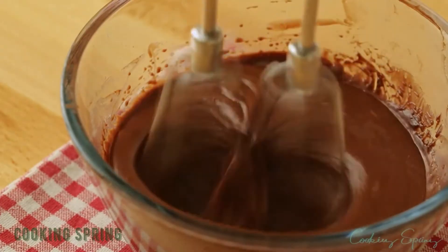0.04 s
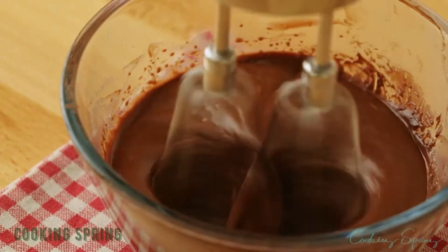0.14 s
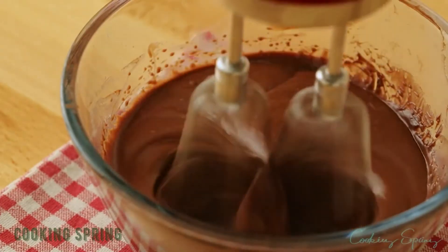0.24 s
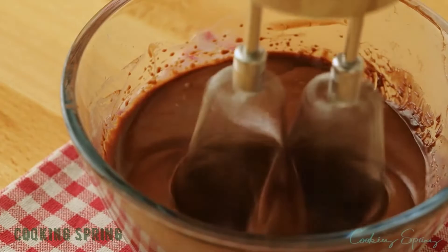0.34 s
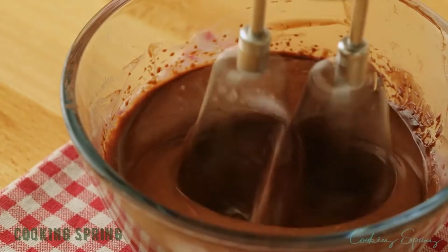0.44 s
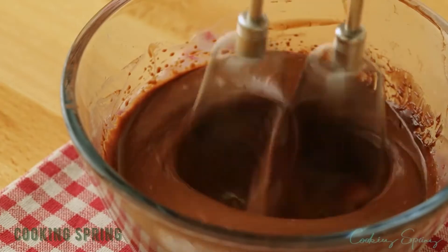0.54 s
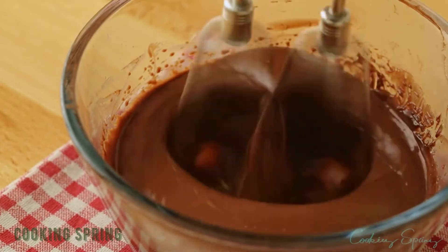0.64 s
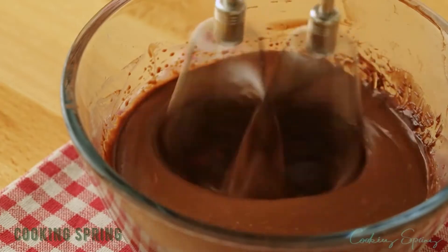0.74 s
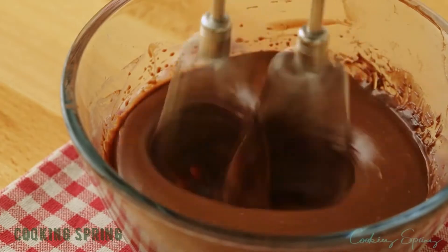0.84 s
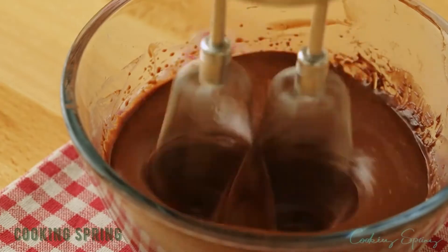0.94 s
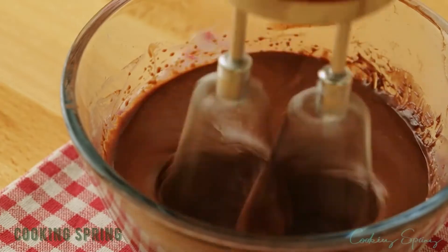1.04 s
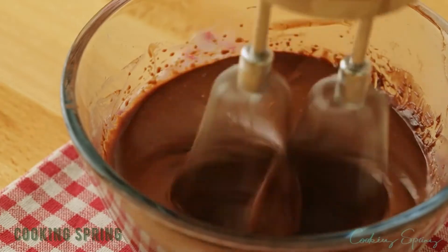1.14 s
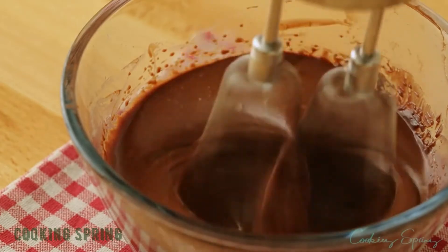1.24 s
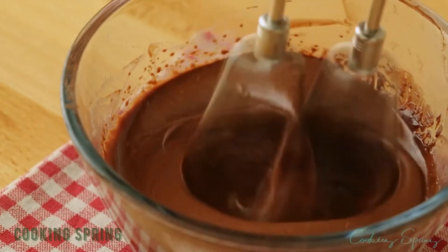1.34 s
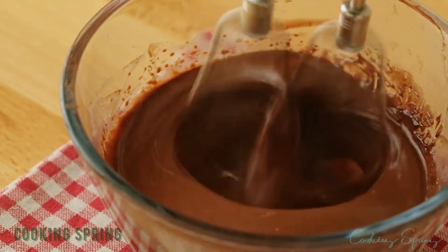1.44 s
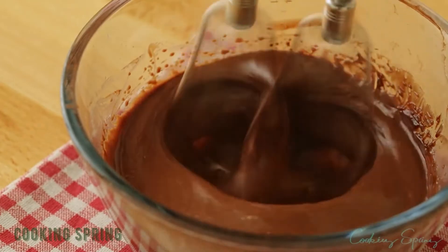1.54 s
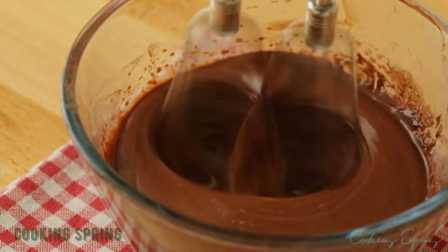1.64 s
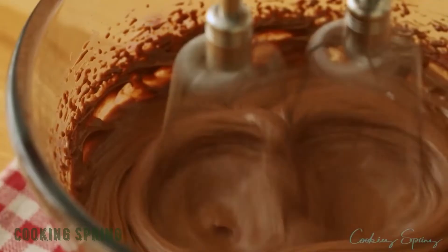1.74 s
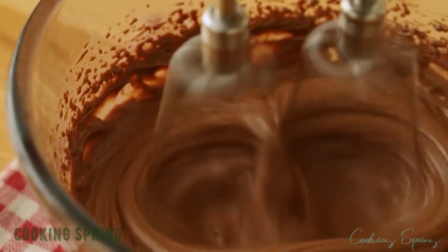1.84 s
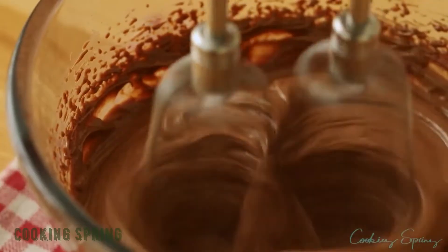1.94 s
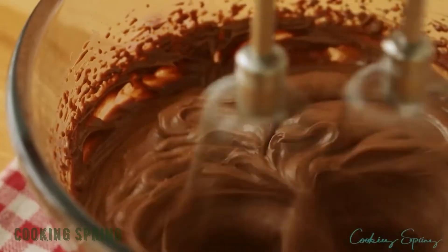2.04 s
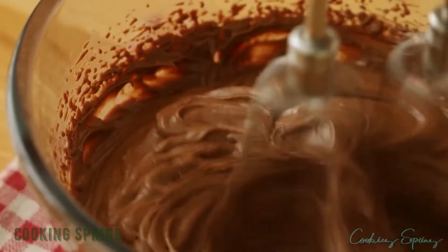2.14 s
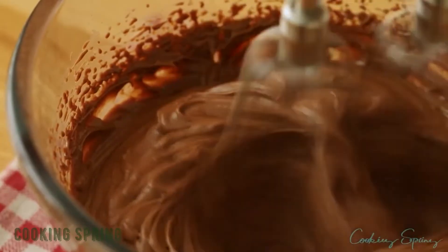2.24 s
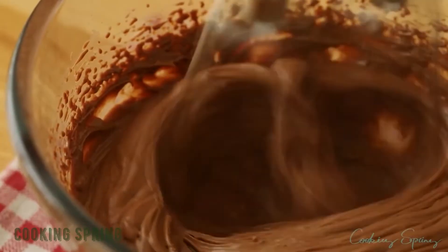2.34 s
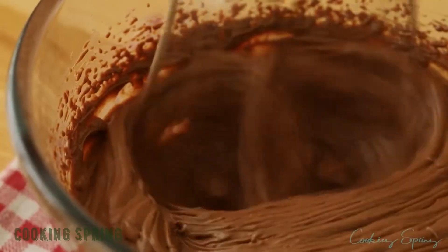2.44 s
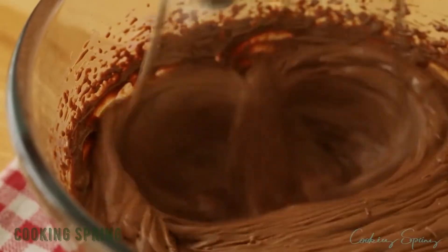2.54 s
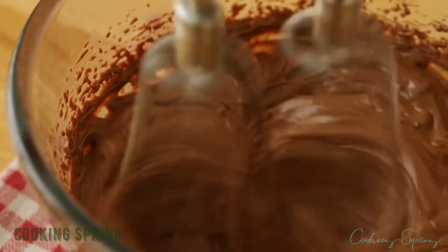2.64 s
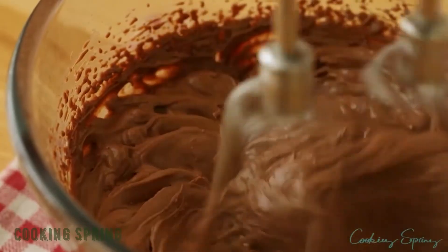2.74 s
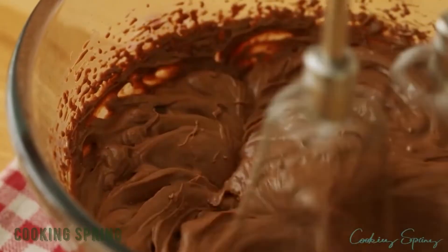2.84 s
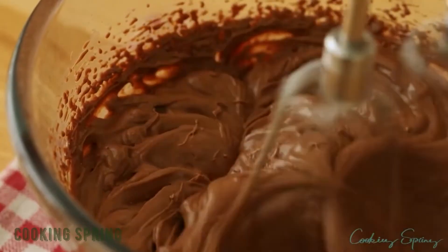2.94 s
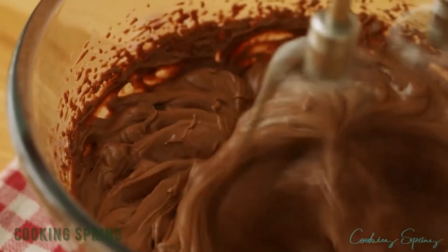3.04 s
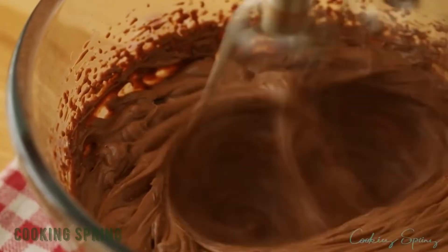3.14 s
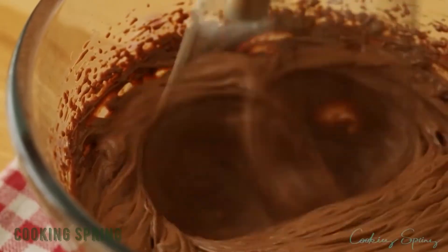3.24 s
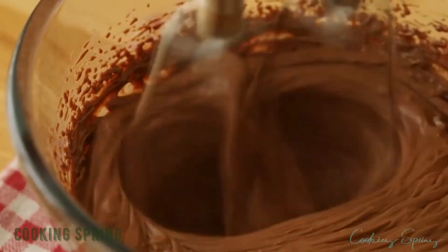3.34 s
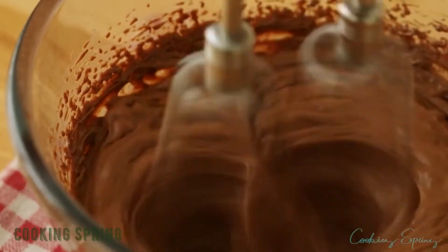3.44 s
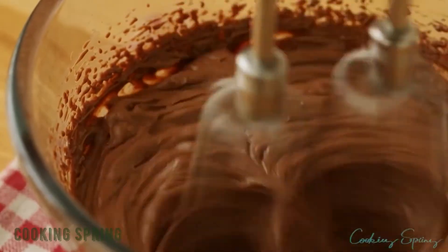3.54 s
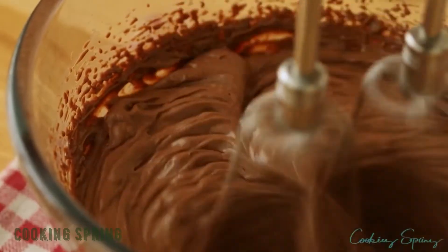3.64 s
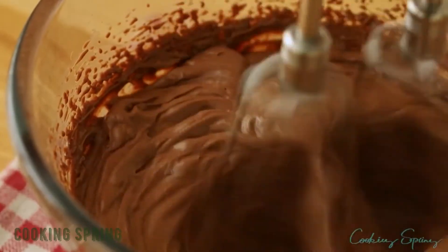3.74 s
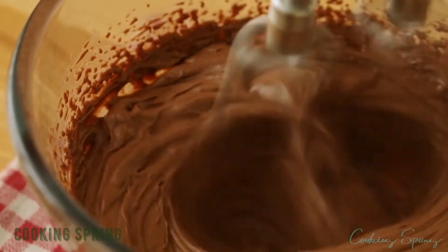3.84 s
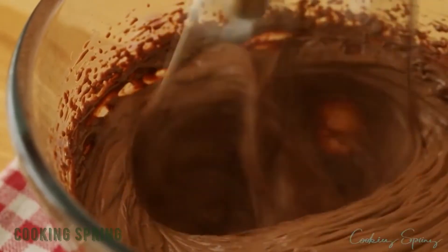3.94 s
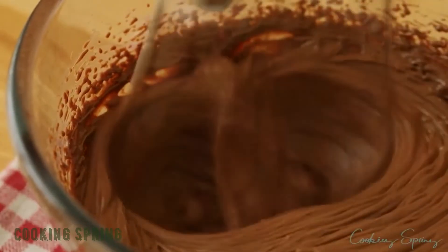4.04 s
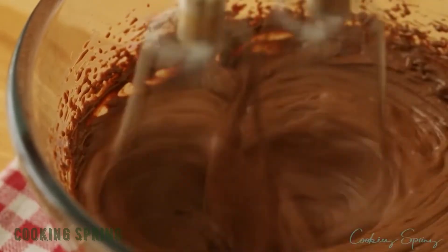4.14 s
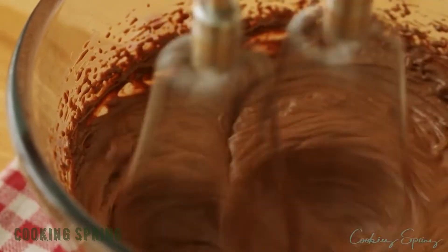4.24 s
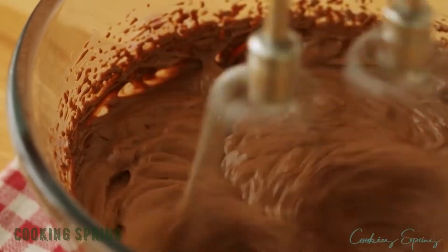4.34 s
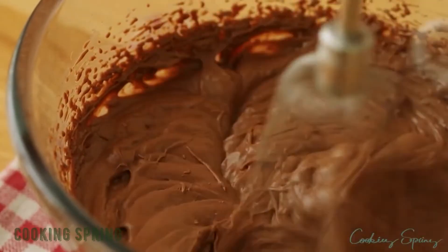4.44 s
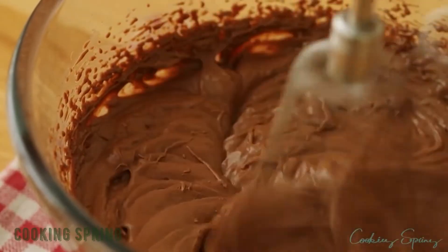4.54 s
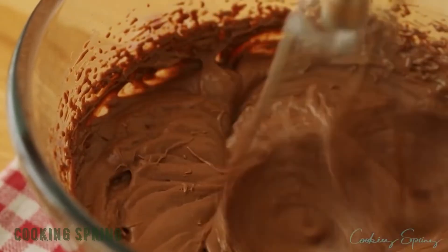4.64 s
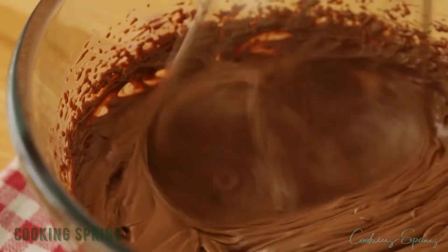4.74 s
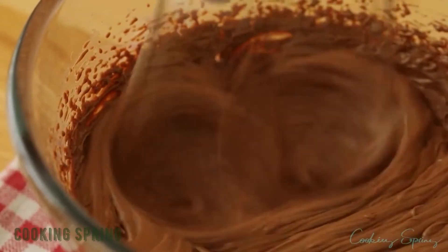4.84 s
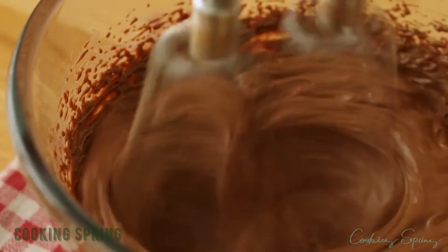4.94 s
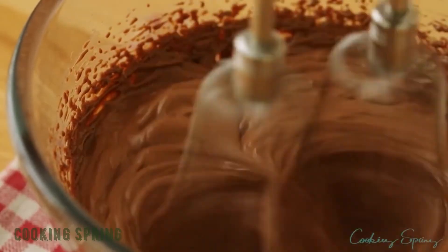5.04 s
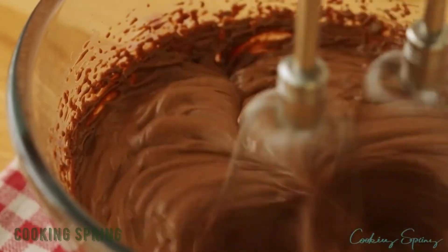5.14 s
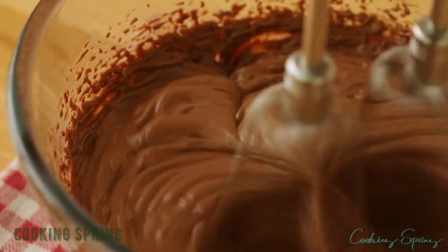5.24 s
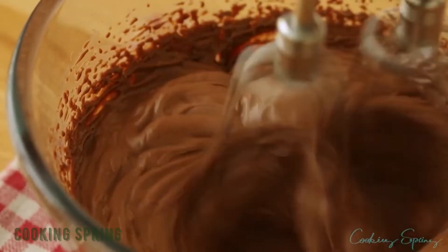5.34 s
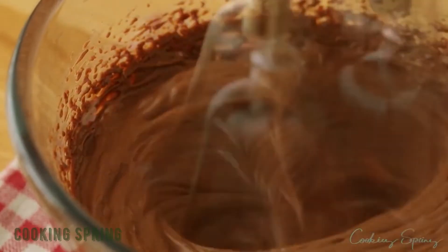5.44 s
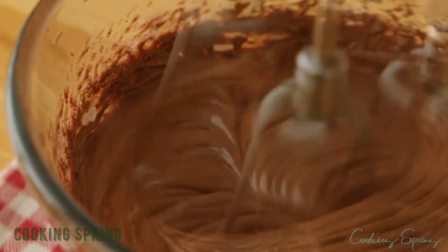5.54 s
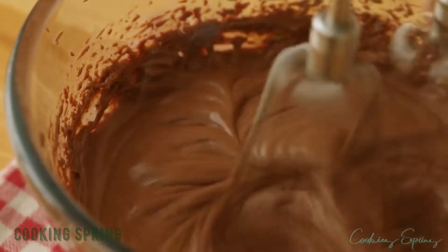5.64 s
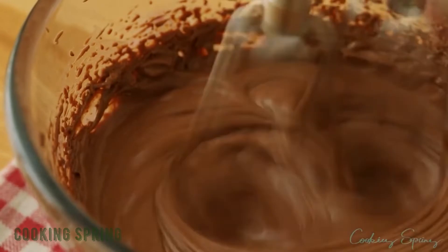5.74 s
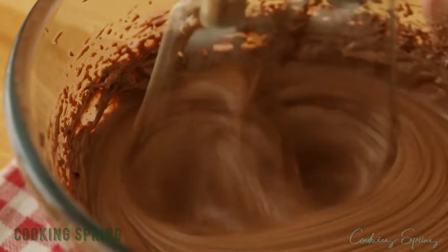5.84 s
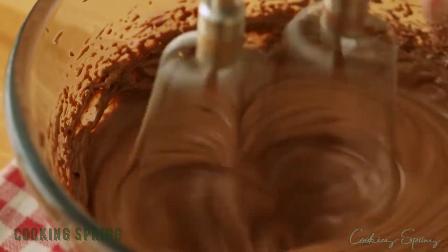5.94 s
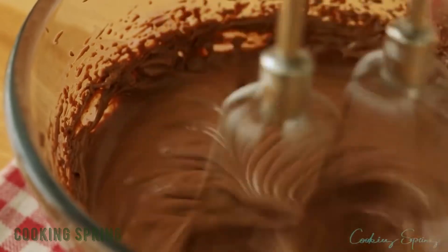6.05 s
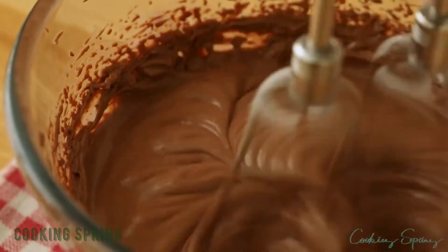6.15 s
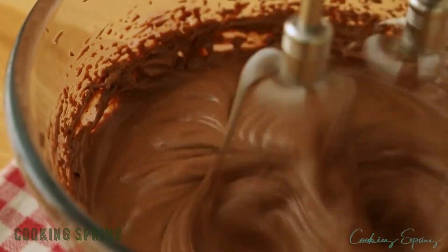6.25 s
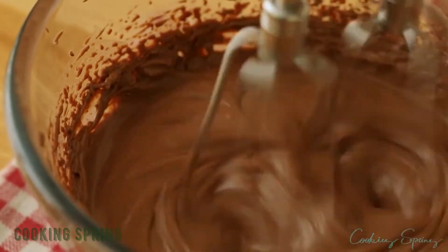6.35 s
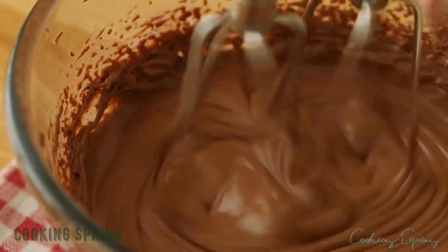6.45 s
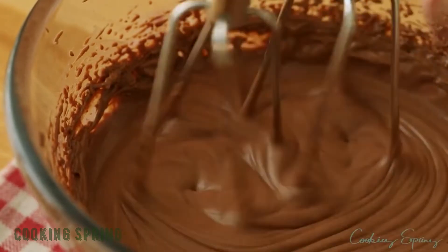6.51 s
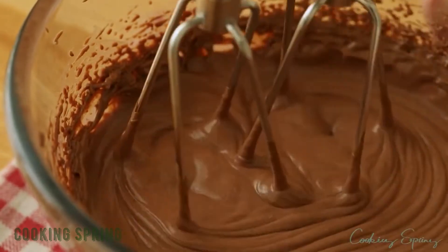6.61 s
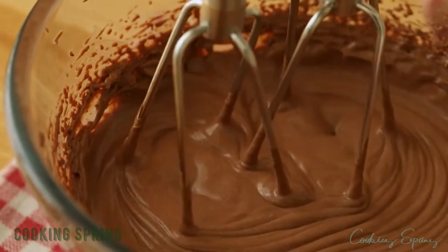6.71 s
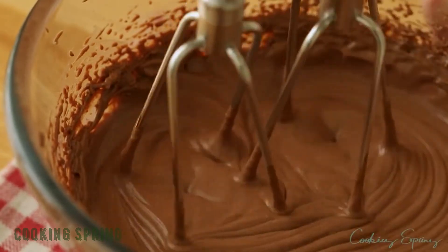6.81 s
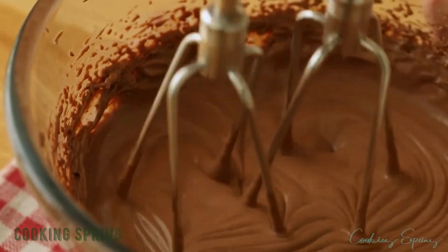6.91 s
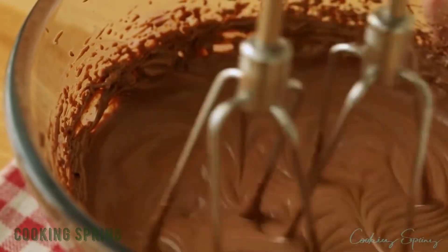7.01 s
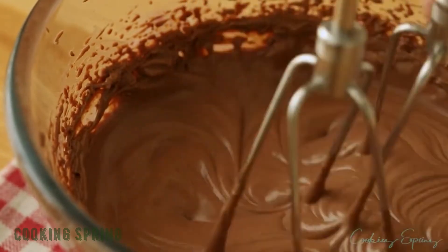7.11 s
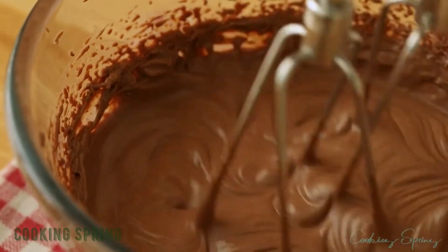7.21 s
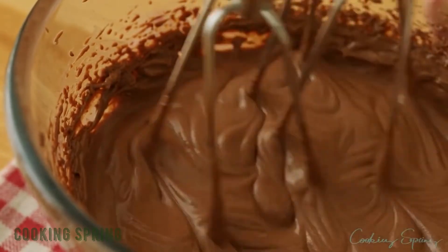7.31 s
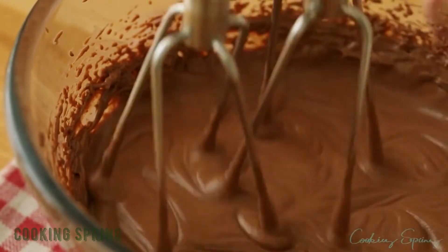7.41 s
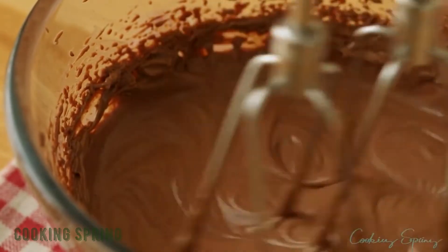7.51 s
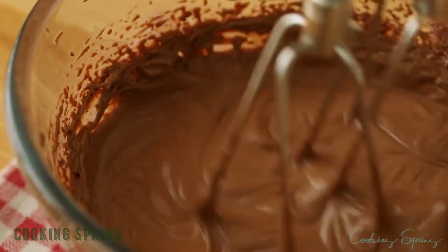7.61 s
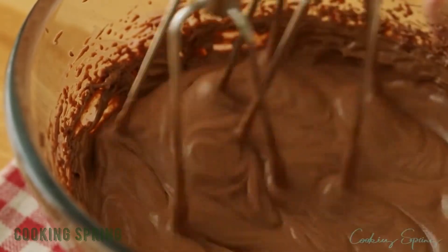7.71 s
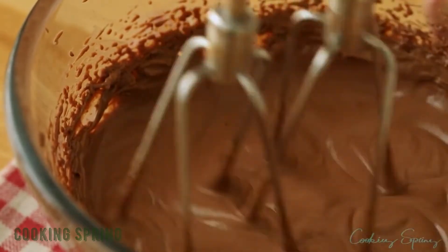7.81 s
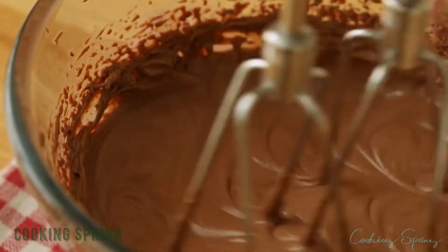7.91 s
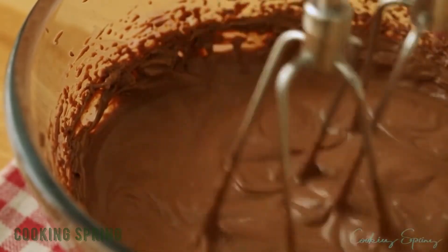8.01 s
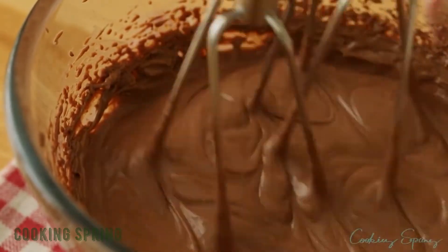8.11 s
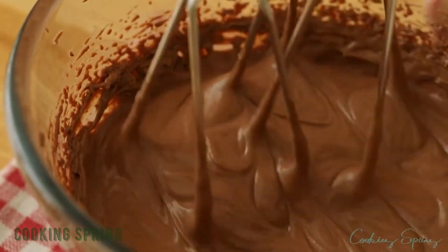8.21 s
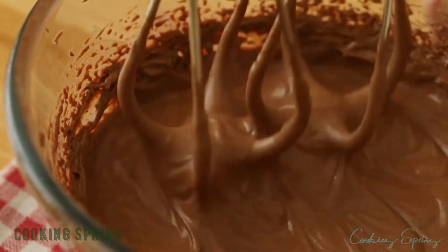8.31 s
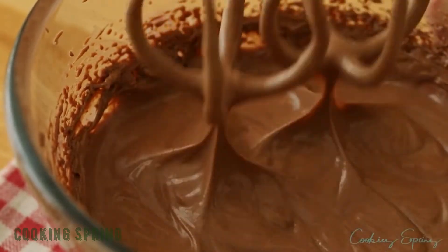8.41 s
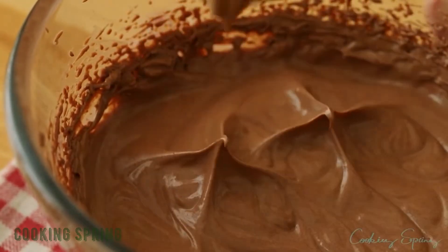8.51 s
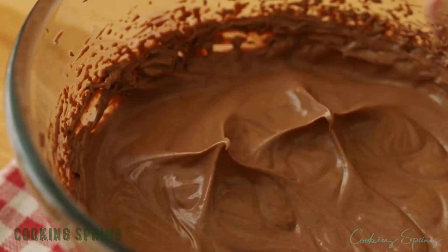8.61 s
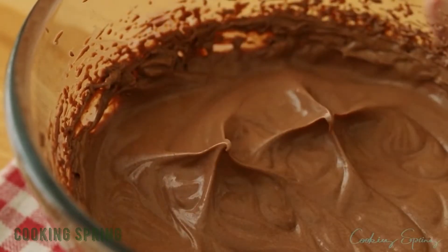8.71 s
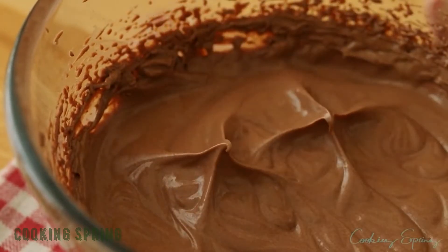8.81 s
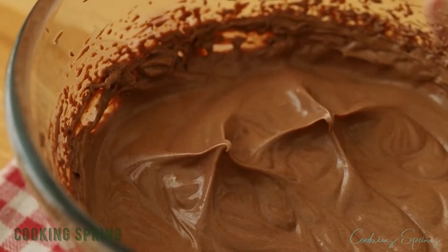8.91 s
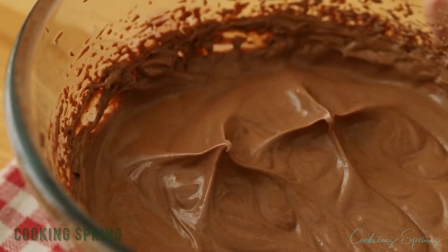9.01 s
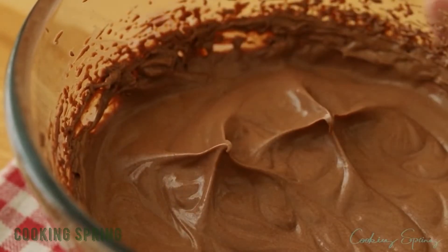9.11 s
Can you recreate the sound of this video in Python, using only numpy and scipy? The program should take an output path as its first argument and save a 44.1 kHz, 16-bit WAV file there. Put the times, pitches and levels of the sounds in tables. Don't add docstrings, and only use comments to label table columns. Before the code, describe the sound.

A hand mixer's fast buzzing whine and airy fan hiss throb over sloppy whipped cream, with irregular bright clinks and dull knocks of steel beaters against glass. After an abrupt change it climbs back to speed, thicker and softer. Another cut drops it to a low, slower hum with distinct clacks. It winds down quickly, then bare beaters tap the bowl in near silence. Close microphone, dry room, weighted left.

```python
import sys
import numpy as np
from scipy import signal
from scipy.io import wavfile
from scipy.ndimage import uniform_filter1d

SR = 44100
rng = np.random.default_rng(int(sys.argv[2]) if len(sys.argv) > 2 else 0)


def gain_from_decibels(decibels):
    exponent = np.asarray(decibels, float) / 20
    return 10 ** exponent


def to_wav(sig):
    pcm = np.clip(np.atleast_2d(sig), -1, 1) * 32767
    pcm = np.round(pcm).astype(np.int16)
    wavfile.write(sys.argv[1], SR, pcm.T)


N = 404396
T = np.arange(N) / SR

# t/s, f/Hz (turns per second)
SHAFT_SPEED = [(0, 292.7), (1.688, 293), (1.69, 205), (1.8, 244), (1.9, 277), (2.02, 298), (2.25, 293),
               (2.8, 292), (4.1, 293), (4.75, 293.3), (5, 291), (5.513, 293), (5.515, 175.5),
               (6.215, 175.5), (6.42, 81), (6.5, 47.5), (6.6, 22)]
CHANGES = [
    1.69,
    5.515,
]
QUIET_S = 6.585


def evened(x):
    return x / np.sqrt(np.mean(x ** 2) + 1e-20)


def peaked(x):
    power = uniform_filter1d(x ** 2, size=66)
    return x / np.sqrt(2 * power.max(axis=1, keepdims=True))


def wander(size):
    once = uniform_filter1d(rng.standard_normal(N), size)
    return evened(uniform_filter1d(once, size))


def noise(points, patchy_db):
    hz = np.fft.rfftfreq(1024, 1 / SR)
    f, db = np.transpose(points)
    a, b, patches = rng.standard_normal((N // 256 + 5, 513, 3)).T
    patches = uniform_filter1d(uniform_filter1d(patches, size=10, axis=0), size=10, axis=1)
    colour = np.interp(np.log(hz + 1), np.log(f), db, left=-90)[:, None] + patchy_db * evened(patches)
    edge = hz[:, None] < 13950
    spectra = (a + 1j * b) * gain_from_decibels(colour) * edge
    return evened(signal.istft(spectra, nperseg=1024, noverlap=768)[1][:N])


def resonance(hz, centre, half_width):
    return 1 / (1 + ((hz - centre) / half_width) ** 2)


def layer_gain(layer):
    # level/dB in thin, thick and slow scene, share of effort, slope/dB per tenfold speed
    layers = [
        (-57, -58.5, -56.5, 0.15, 39),
        (-55.5, -63, -59.5, 0.83, 32),
        (-60, -64, -57.5, 1.06, 23.5),
    ]
    # t/s, level/dB
    stirring = [(0, 2.5), (.2, 1.5), (.32, 5.5), (.75, 2.5), (1.05, 3.5), (1.28, 7.5), (1.5, 0.5),
                (2.1, .5), (2.65, 6.5), (3.1, 4), (4.3, 2), (4.55, 2), (4.9, 2), (5.5, 2), (6.15, 5),
                (6.4, 4.5)]
    full_speed = (293, 293, 176)
    *scene_db, share, slope_db = layers[layer]
    now = np.searchsorted(CHANGES, T)
    speed = np.interp(T, *np.transpose(SHAFT_SPEED)) / np.take(full_speed, now)
    effort_db = np.interp(T, *np.transpose(stirring))
    gain_db = np.take(scene_db, now) + share * effort_db + slope_db * np.log10(speed)
    return gain_from_decibels(gain_db) * (T < QUIET_S)


def motor(hz, shaft, throb, rough, whine_db, air_db, coast_db):
    multiples = (1, 3, 4, 5, 6, 7, 8, 12, 24, 48, 10)
    # level/dB in fast gear, level/dB in slow gear
    whine_levels = [(-8.5, -9.5), (-11, -11), (-12, -4), (-18, -7), (-8, -22), (-28, -30), (4.2, -34),
                    (-5.5, 1.5), (-13, -4.5), (-54, -26), (3, -40)]
    # f/Hz, level/dB, extra level/dB in slow gear
    windings = [(360, -75.5, 4), (720, -73, 15)]
    # f/Hz, level/dB per Hz
    air_colour = [(820, -8), (1400, -28), (1560, -124), (1780, -2), (2310, 2.5), (2770, -5.5), (3530, -8.5),
                  (3700, -8.5), (7060, -42), (14000, -28)]
    slow, powered = T > CHANGES[1], T < 6.21
    gear = 2 * np.pi * shaft / 10
    sway = np.sin(gear)
    wobble = 0.15 * wander(size=300)
    squeeze = np.exp(throb * (np.cos(gear) + 0.075 * np.cos(2 * gear + 2.3) + wobble))
    pressed = evened(squeeze)
    drift = rough * wander(size=400) * (0.083 + 0.26 * powered)
    whine = np.zeros(N)
    for k, (fast_db, slow_db) in zip(multiples, whine_levels):
        f = k * hz
        phase = 2 * np.pi * k * shaft + np.sqrt(k) * np.roll(drift, 999 * k)
        tone = np.cos(phase - 0.04 * (k < 9) * k * sway * ~slow)
        coasting = min(k / 14, 40 / k) * np.minimum(f / 1300, 1) ** 1.5 * pressed ** 0.6
        tone *= np.where(powered, 1, coasting)
        housing = np.minimum(f / 172, 1) ** 8
        modes = 0.27 + 1.8 * resonance(f, 1900, 150) + 1.05 * resonance(f, 3500, 260)
        modes += 2.2 * resonance(f, 1150, 130)
        housing *= np.where(powered, 1, modes)
        if k in (8, 10):
            case = resonance(f, 2345, 330 if k < 9 else 140) + 0.6 * resonance(f, 1900, 90)
            housing *= np.where(slow, 1, case)
        if k == 8:
            tone *= np.where(slow, 1, pressed)
        whine += np.where(slow, gain_from_decibels(slow_db), gain_from_decibels(fast_db)) * housing * tone
    whine -= 0.45 * gain_from_decibels(whine_levels[0][0]) * np.cos(2 * np.pi * shaft) * (T < CHANGES[0])
    lag = np.where(slow, 1 - hz / 176, 0.2 - hz / 1465)
    whine *= gain_from_decibels(coast_db * lag)
    sparks = 1 + 0.16 * np.cos(4 * gear) + 0.14 * np.cos(2 * gear)
    air = noise(air_colour, patchy_db=1.0) * evened(sparks * squeeze ** 0.055) * gain_from_decibels(-coast_db * lag)
    buzz = np.zeros(N)
    for f, db, slow_db in windings:
        buzz += gain_from_decibels(db + slow_db * slow) * np.cos(2 * np.pi * f * T + 0.44 * wander(size=2000))
    return layer_gain(layer=0) * (gain_from_decibels(whine_db) * whine + gain_from_decibels(air_db) * air) + buzz * (T < 6.23)


def vents():
    # f/Hz, width/Hz, level/dB, end t/s
    whistles = [
        (7350, 320, -77, 6.6),
        (11000, 250, -77, 6.23),
    ]
    out = np.zeros(N)
    for hz, width, db, end in whistles:
        a, b = uniform_filter1d(rng.standard_normal((2, N)), round(SR / width / 2))
        whistle = evened(a * np.cos(2 * np.pi * hz * T) + b * np.sin(2 * np.pi * hz * T))
        out += gain_from_decibels(db) * whistle * (T > CHANGES[1]) * (T < end)
    return out


def cream(shaft, spread_db, splash_db, churn_db):
    # f/Hz, level/dB per Hz
    folding = [(53, -60), (90, -33), (225, -8.5), (471, -1.5), (739, -1), (1610, -4), (1800, -2.5),
               (2340, -9), (3960, -120)]
    passes = np.flatnonzero(np.diff(np.floor(shaft * 2 / 5)))
    chance = rng.random(len(passes))
    flicks = np.zeros(N)
    flicks[passes] = gain_from_decibels(-spread_db * np.log(chance + 0.05))
    flicks = signal.lfilter([1], [1, -np.exp(-1 / (0.0057 * SR))], flicks)
    spray = evened(0.8 + evened(flicks))
    splash_colour = [(900, -18), (3500, 15.5), (7500, 9.5), (8500, 1.5), (11000, -4), (14000, -4.0)]
    splash = noise(splash_colour, patchy_db=1.8) * spray
    churn = noise(folding, patchy_db=3.0) * gain_from_decibels(2.6 * wander(size=500))
    churn = evened(churn * spray ** 0.28)
    return gain_from_decibels(splash_db) * layer_gain(layer=1) * splash + gain_from_decibels(churn_db) * layer_gain(layer=2) * churn


def strikes():
    # t/s, glass level/dB, wire level/dB
    thin_knocks = [(.0012, -40.5, -40), (0.0662, -54, -36.5), (0.098, -44, -38), (.4979, -55, -43),
                   (.856, -55, -43), (1.0187, -60, -47), (1.144, -52, -39), (.618, -47, -38),
                   (0.634, -54, -46), (0.6521, -47, -39), (.7321, -70, -40), (0.717, -66, -49),
                   (.763, -65, -42), (1.0918, -47, -41), (1.4054, -48, -41), (1.516, -50, -46),
                   (1.534, -63, -48), (1.5707, -41.5, -43.5), (1.6361, -42.5, -37.5)]
    # t/s, glass level/dB, wire level/dB
    thick_knocks = [(1.737, -56, -83), (1.9326, -51, -56), (1.9669, -43, -52), (2.0314, -46, -52),
                    (2.2962, -43.5, -50), (2.5681, -52, -47), (2.63, -42, -40), (2.772, -67, -49),
                    (2.8386, -66, -47), (3.101, -45, -55), (3.4331, -44, -71), (3.7757, -49, -62),
                    (3.7916, -42.5, -54), (3.861, -47.5, -56.5), (3.963, -46.5, -54), (4.0008, -47, -49),
                    (4.1969, -45.5, -49.5), (4.3842, -51.5, -46.5), (4.392, -56, -51), (4.589, -57, -47.5),
                    (4.5986, -72, -53), (4.7007, -51, -46), (4.762, -54, -51), (4.7955, -44.5, -48),
                    (5.2226, -55, -65), (5.273, -59, -71), (5.308, -59, -63), (5.3917, -45, -51.5),
                    (5.4298, -48.5, -60), (5.4942, -48, -61)]
    # t/s, glass level/dB, wire level/dB
    slow_knocks = [(5.5245, -44, -42), (5.5358, -38, -39), (5.5503, -41, -39), (5.5637, -37, -33),
                   (5.5787, -42, -35), (5.6789, -34.5, -39.5), (5.7286, -41, -59), (5.739, -32, -43.5),
                   (5.798, -31, -55.5), (5.863, -35.5, -51), (5.9691, -38.5, -44), (6.0215, -45, -38.5),
                   (6.1783, -44.5, -51), (6.2301, -40.5, -36.5), (6.3003, -45.5, -57), (6.3929, -49.5, -71),
                   (6.4317, -52, -76), (6.458, -56.5, -76), (6.5189, -53, -76), (6.571, -59, -77)]
    # first t/s, last t/s, hits, glass level/dB, wire level/dB
    thin_rattles = [(0.241, 0.272, 4, -45, -46), (0.328, 0.345, 3, -46.5, -40.5),
                    (0.3983, 0.463, 3, -49, -43), (.532, 0.599, 3, -45.5, -36.5),
                    (0.6687, 0.7054, 2, -45.5, -32.5), (0.837, 0.9322, 4, -47, -36),
                    (1.102, 1.2366, 5, -45, -39.5), (1.227, 1.2973, 3, -46, -35.5),
                    (1.33, 1.3985, 3, -45.5, -36), (1.431, 1.4655, 2, -52, -39.5)]
    # first t/s, last t/s, hits, glass level/dB, wire level/dB
    thick_rattles = [(2.125, 2.1362, 2, -41.5, -45.5), (2.1927, 2.202, 2, -45.5, -51),
                     (2.3578, 2.367, 2, -50, -51), (2.4, 2.4205, 2, -48, -52),
                     (2.4283, 2.437, 2, -40, -43.5), (2.496, 2.503, 2, -44, -40.5),
                     (2.5934, 2.602, 2, -43, -40), (2.655, 2.664, 2, -48, -41.5),
                     (2.6875, 2.696, 2, -53, -40), (2.713, 2.726, 3, -47, -41.5),
                     (2.785, 2.793, 2, -43.5, -38), (2.855, 2.862, 2, -41, -38.5),
                     (2.9025, 2.9307, 4, -45, -38), (2.991, 2.9978, 2, -43, -42),
                     (3.057, 3.065, 2, -46.5, -46.5), (3.1276, 3.1625, 2, -45, -50),
                     (3.197, 3.265, 3, -50, -56)]
    # first t/s, last t/s, hits, glass level/dB, wire level/dB
    late_rattles = [(3.297, 3.303, 2, -48.5, -57), (3.4964, 3.562, 3, -45.5, -60),
                    (3.591, 3.609, 3, -44.5, -61), (3.617, 3.633, 3, -42, -60), (3.676, 3.744, 3, -53, -62),
                    (4.4283, 4.461, 5, -48, -35.5), (4.495, 4.5205, 4, -48.5, -35.5),
                    (4.657, 4.6655, 2, -48, -39.5), (4.718, 4.726, 2, -50.5, -38),
                    (4.825, 4.8364, 2, -47, -46)]
    # first t/s, last t/s, hits, glass level/dB, wire level/dB
    slow_rattles = [
        (5.623, 5.636, 2, -37.5, -44),
        (5.9053, 5.9156, 2, -37.5, -38.5),
        (6.0623, 6.076, 2, -41, -32.5),
        (6.1052, 6.1188, 2, -38, -34.5),
    ]
    # crack's share of wire 0-1, crack/dB, thud/dB, ring/dB,
    # ring growth along a rattle/dB, ring loss per dB of depth
    contact = [
        (0.87, 2.2, -4, -6, -0.5, 3.5),
        (0.24, 4, -4.5, 2, 2, 0.6),
        (0.46, 1, 2, 0, 2.5, 5.5),
    ]
    # t/s, level/dB
    immersion = [(0, -3), (.06, 1.5), (.4, 3), (1.5, 0.5), (1.56, -4), (1.7, 4.5), (2.3, -2), (2.66, 7.5),
                 (2.8, 0.5), (3.2, -1), (3.6, -1), (4.45, 5), (5.5, 0.5), (5.8, -2), (6.05, 2.5),
                 (6.6, -1.5)]
    # t/s, crack level/dB, thud level/dB, clack level/dB, wire ring level/dB
    stopped_taps = [(6.9683, -49, -39, -47.5, -51.5), (7.1271, -30, -27.5, -22, -39),
                    (7.146, -65, -47, -57, -53), (7.3284, -48, -101, -53, -42),
                    (7.381, -43, -43, -34.5, -38.5), (7.441, -61, -86.5, -54, -55),
                    (7.569, -48, -44, -57, -50), (7.585, -26.5, -25.5, -19, -21.5),
                    (7.5967, -62, -56.5, -31, -48), (7.7053, -39, -36.5, -30, -31.5),
                    (7.741, -37, -37.5, -28.5, -35), (7.7564, -54, -57, -53, -49),
                    (8.0127, -45, -38, -32, -39.5)]
    hits = [(*row, 0.5) for row in thin_knocks + thick_knocks + slow_knocks]
    for first, last, count, glass_db, wire_db in thin_rattles + thick_rattles + late_rattles + slow_rattles:
        u = np.linspace(0, 1, round(count))
        arch_db = 2.5 * (np.sin(np.pi * u) - 0.5) * (count > 2.5)
        hits += list(zip(first + (last - first) * u, glass_db + arch_db, wire_db + arch_db, u))
    s, glass_db, wire_db, u = np.transpose(hits)
    share, crack_db, thud_db, ring_db, growth_db, loss = np.array(contact)[np.searchsorted(CHANGES, s)].T
    depth_db = np.interp(s, *np.transpose(immersion))
    crack_db = crack_db + glass_db + share * (wire_db - glass_db) - depth_db
    thud_db = thud_db + glass_db + depth_db
    ring_db = ring_db + wire_db + growth_db * (u - 0.5) - loss * depth_db
    return np.r_[np.c_[s, crack_db, thud_db, glass_db, ring_db], stopped_taps]


def burst(part, count, t, late_db):
    low_hz, high_hz, rise, t60 = part
    shape = (1 - np.exp(-t / rise)) * (gain_from_decibels(-60 * t / t60) + gain_from_decibels(late_db - 20 * t / t60))
    band = signal.butter(3, [low_hz, high_hz], "band", fs=SR, output="sos")
    return peaked(signal.sosfilt(band, shape * rng.standard_normal((count, len(t)))))


def ring(modes, count, t, spread):
    out = np.zeros((count, len(t)))
    for hz, db, t60 in modes:
        place, weight = 2 * rng.random((2, count, 1)) - 1
        tone = np.sin(2 * np.pi * hz * (1 + spread * place) * t)
        out += gain_from_decibels(db + 5.0 * weight - 60 * t / t60) * tone
    out *= 1 - np.exp(-t / 0.00036)
    return peaked(np.diff(out, prepend=0))


def knocks(tick_db, chink_db, bump_db, bowl_db, late_db):
    # low f/Hz, high f/Hz, rise t/s, t60/s
    crack = (2940, 5070, 0.00019, 0.016)
    # low f/Hz, high f/Hz, rise t/s, t60/s
    wet_crack = (3000, 5500, 0.00022, 0.0073)
    # low f/Hz, high f/Hz, rise t/s, t60/s
    clack = (1722, 2455, 0.000051, 0.024)
    # low f/Hz, high f/Hz, rise t/s, t60/s
    tick = (2100, 12300, 0.00019, 0.021)
    # low f/Hz, high f/Hz, rise t/s, t60/s
    chink = (6240, 7870, 0.000095, 0.021)
    # low f/Hz, high f/Hz, rise t/s, t60/s
    thud = (624, 1280, 0.00049, 0.035)
    # low f/Hz, high f/Hz, rise t/s, t60/s
    bare_thud = (980, 1770, 0.00028, 0.024)
    # low f/Hz, high f/Hz, rise t/s, t60/s
    bump = (167, 353, 0.005, 0.049)
    # low f/Hz, high f/Hz, rise t/s, t60/s
    table = (334, 604, 0.00047, 0.052)
    # low f/Hz, high f/Hz, rise t/s, t60/s
    shaking = (12, 167, 0.0024, 0.034)
    # f/Hz, level/dB, t60/s
    bowl = [(1238, 2, 0.023), (1505, -6.5, 0.052), (1930, 6.5, 0.016), (2233, 8, 0.012),
            (2875, -7.5, 0.023), (3700, -22.5, 0.061) ]
    # f/Hz, level/dB, t60/s
    wire = [(6715, 0, .03), (6770, -27, .2), (6690, -29, .16), (6860, -31, .12), (10480, -24, .03)]
    # f/Hz, level/dB, t60/s
    spinning_wire = [(7700, 2, 0.0099), (10100, -6, 0.012), (13300, -15, 0.017)]
    out, bumps, t = np.zeros(N + 4000), np.zeros(N + 4000), np.arange(3000) / SR
    s, crack_db, thud_db, clack_db, ring_db = strikes().T[:, :, None]
    count = len(s)
    running, thin, thick = s < QUIET_S, s < CHANGES[0], (s > 2) & (s < 5.5)

    def dense(part, tail_db=late_db):
        return burst(part, count, t, tail_db)

    sound = gain_from_decibels(crack_db) * np.where(thin, dense(wet_crack), dense(crack))
    sound += gain_from_decibels(tick_db) * (gain_from_decibels(crack_db) + gain_from_decibels(ring_db + 1.0) * thick) * dense(tick)
    sound += gain_from_decibels(clack_db) * dense(clack) * np.where(running, 0.8, 0.35)
    sound += gain_from_decibels(clack_db + bowl_db - 4.7 * running) * ring(bowl, count, t, spread=0.0084)
    steel = ring(wire, count, t, spread=0.0027)
    steel += gain_from_decibels(chink_db - 6.0 * ~running) * dense(chink, late_db - 7.0)
    sound += gain_from_decibels(ring_db) * steel
    sound += gain_from_decibels(ring_db - 5.0) * thick * ring(spinning_wire, count, t, spread=0.03)
    sound += gain_from_decibels(thud_db) * np.where(running, dense(thud), dense(bare_thud))
    sound += gain_from_decibels(thud_db + bump_db + 10.0 * thin) * running * dense(bump)
    sound += gain_from_decibels(thud_db - 26.0) * ~running * dense(table)
    force = gain_from_decibels((ring_db + crack_db) / 2 - 44.0) * thick
    force += gain_from_decibels(thud_db - 39) * (running & (s > 5.5)) + gain_from_decibels(thud_db - 54) * ~running
    shake = force * dense(shaking)
    fade = np.minimum(3 - 3 * t / t[-1], 1)
    for at, a, b in zip(np.round(s[:, 0] * SR).astype(int), sound, shake):
        out[at:at + len(t)] += a * fade
        bumps[at:at + len(t)] += b
    edge = signal.butter(10, 14100, fs=SR, output="sos")
    return signal.sosfilt(edge, out[:N]), bumps[:N]


def spots():
    # t/s, peak level/dB, f/Hz
    thin_spots = [(0.0661, -45, 2250), (0.0977, -22, 4630), (0.3262, -37, 3850), (0.3346, -37, 4150),
                  (0.3464, -30, 3710), (0.3955, -39, 4140), (0.5662, -29, 4400), (0.5989, -30.5, 2360),
                  (0.671, -38, 4310), (0.7026, -37, 4150), (0.835, -29.5, 4320), (0.8678, -38, 1290),
                  (0.9002, -28, 1920), (0.9322, -38, 1250), (1.2026, -28, 4210), (1.227, -27, 2330),
                  (1.262, -26.5, 2330), (1.2956, -29, 2250), (1.3288, -30.5, 2350), (1.3622, -20, 4470),
                  (1.3966, -27, 4150), (1.4305, -28, 4620), (1.517, -37, 4820), (1.5702, -35, 1820),
                  (1.6363, -34, 3930)]
    # t/s, peak level/dB, f/Hz
    thick_spots = [(1.966, -31, 2000), (2.032, -44, 3550), (2.133, -24, 4100), (2.296, -29, 2330),
                   (2.435, -29, 2040), (2.503, -39, 2060), (2.598, -32, 732), (2.63, -36, 762),
                   (2.696, -36.5, 754), (2.786, -43, 2280), (2.856, -35.5, 970), (2.913, -29, 3730),
                   (2.989, -38, 2120), (3.057, -34, 2320), (3.293, -41, 1880), (3.432, -45, 2320),
                   (3.613, -47, 2270), (3.792, -33, 2300), (3.862, -37, 2320), (4.001, -37, 2350),
                   (4.197, -38, 1820), (4.658, -41.5, 895), (4.796, -36, 2400), (5.392, -31, 2360)]
    # t/s, peak level/dB, f/Hz
    slow_spots = [(5.521, -36, 845), (5.538, -30.5, 920), (5.5535, -32, 960), (5.567, -29.5, 950),
                  (5.623, -40, 756), (5.68, -20.5, 2106), (5.739, -30.5, 744), (5.798, -22.5, 2110),
                  (5.863, -30, 1150), (5.864, -36, 560), (5.906, -36, 830), (5.916, -30, 1090),
                  (5.969, -35, 890), (6.022, -41, 2060), (6.073, -37, 880), (6.118, -31, 840),
                  (6.179, -31, 2380), (6.23, -40, 1040), (6.303, -50, 1090), (6.395, -45, 990),
                  (6.431, -56, 757), (6.52, -44, 1150), (6.572, -53, 2080)]
    # t/s, peak level/dB, f/Hz, t60/s
    bare_spots = [(6.9701, -45, 1000, 0.035), (7.1266, -36.5, 913, 0.042), (7.585, -46, 1210, .04),
                  (7.585, -40, 940, 0.044), (6.9677, -36, 1250, 0.026), (6.968, -41, 3060, 0.015),
                  (7.1267, -20, 1397, 0.032), (7.1268, -21, 1850, 0.017), (7.1273, -30, 2950, 0.02),
                  (7.1265, -27, 1190, .03), (7.585, -49, 3730, .2), (7.585, -51, 3830, .17),
                  (7.7412, -55, 3715, .12), (7.1266, -29, 4510, 0.019), (7.3293, -30, 2960, 0.01),
                  (7.3289, -29, 6050, 0.0078), (7.3812, -29, 1960, 0.028), (7.585, -25, 2250, 0.024),
                  (7.586, -24.5, 1500, 0.055), (7.586, -28, 2940, 0.038), (7.706, -24, 2400, 0.021),
                  (7.705, -38, 1490, 0.063), (7.7418, -29, 1285, 0.032), (7.7427, -23.5, 2480, 0.019),
                  (8.0129, -18.5, 1930, 0.02), (8.0128, -32, 1276, 0.032)]
    out, t = np.zeros(N + 4000), np.arange(3000) / SR
    rise = 1 - np.exp(-t / 0.00038)
    wet = [(s, db - 2.5, hz, 30 / hz) for s, db, hz in thin_spots + thick_spots + slow_spots]
    for s, db, hz, t60 in wet + bare_spots:
        out[round(s * SR):][:len(t)] += gain_from_decibels(db - 60 * t / t60) * rise * np.sin(2 * np.pi * hz * t)
    return out[:N]


def snaps():
    # t/s, peak level/dB
    contacts = [(0.0986, -50), (1.3622, -47), (1.3966, -47), (1.5702, -55), (2.132, -45), (2.2946, -48),
                (2.4353, -40), (2.5021, -45), (2.5979, -35), (2.7264, -38), (2.785, -31), (2.853, -35),
                (2.9047, -38), (2.911, -30), (2.989, -45), (3.0654, -57), (3.7912, -44), (3.9636, -50),
                (4.1963, -52), (4.392, -40), (4.4352, -48), (4.4445, -30), (4.5037, -26.5), (4.6572, -54),
                (4.7186, -62), (4.7949, -48), (4.8325, -42), (5.5372, -37), (5.6789, -45), (5.7378, -43),
                (6.0212, -60), (6.0611, -52), (6.117, -46), (6.2292, -31), (6.9689, -61), (7.126, -49),
                (7.2764, -70), (7.3146, -54), (7.3293, -30.5), (7.3805, -51), (7.568, -47), (7.5845, -36),
                (7.6908, -56), (7.705, -44), (7.741, -54), (7.9785, -72), (8.8012, -68)]
    out, t = np.zeros(N + 4000), np.arange(3000) / SR
    band = signal.butter(4, (6900, 13500), "band", fs=SR, output="sos")
    decay = gain_from_decibels(-60 * t / 0.0091)
    bursts = peaked(signal.sosfilt(band, decay * rng.standard_normal((len(contacts), len(t)))))
    for (s, db), snap in zip(contacts, bursts):
        out[round(s * SR):][:len(t)] += gain_from_decibels(db - 6) * snap
    return out[:N]


def jolts():
    # t/s, peak level/dB
    pushes = [(2.132, -69), (2.194, -71), (2.295, -66), (2.429, -65), (2.499, -71), (2.598, -68),
              (2.629, -65), (2.726, -72), (2.787, -66), (2.857, -68), (2.911, -65), (2.99, -65),
              (3.058, -66), (4.196, -74), (4.445, -68), (4.504, -68), (4.657, -70), (5.391, -73)]
    out, u = np.zeros(N), np.arange(1500) / SR / 0.008
    push = 0.2 * u * np.exp(-u) - np.sin(np.pi * np.minimum(u, 1)) ** 2
    for s, db in pushes:
        out[round(s * SR):][:len(u)] += gain_from_decibels(db) * push
    return out


def kitchen(x, t60, wet_db):
    size = SR // 2
    taps = np.zeros((2, size))
    at = np.arange(200, size - 20, 20)
    at = at + rng.integers(0, 20, (2, len(at)))
    np.put_along_axis(taps, at, rng.choice([-1., 1.], at.shape), 1)
    taps = signal.lfilter([1], [1, -0.6], taps * gain_from_decibels(-60 * T[:size] / t60))
    tail = taps[0] + 0.29 * taps
    return gain_from_decibels(wet_db) * signal.oaconvolve(x[None], tail / np.linalg.norm(tail[0]), axes=1)[:, :N]


def room():
    # f/Hz, level/dB per Hz
    hiss_colour = [(24, -85), (40, -41), (321, -32.5), (346, -23), (421, -27.5), (640, -32.5), (800, -33),
                   (992, -25), (1240, -7.5), (1540, -4), (2460, -6.5), (2850, -9), (14000, -38)]
    # f/Hz, width/Hz, level/dB
    fuzzy_tones = [(470, 40, -89), (885, 25, -88), (1254, 20, -78), (350, 12, -93)]
    tones = np.zeros(N)
    for hz, width, db in fuzzy_tones:
        size = round(SR / width)
        tone = wander(size) * np.cos(2 * np.pi * hz * T) + wander(size) * np.sin(2 * np.pi * hz * T)
        tones += gain_from_decibels(db) * tone
    since = T - QUIET_S
    tones *= gain_from_decibels(3.0 - 2.0 * since)
    onset = gain_from_decibels(6.9 * np.exp(-abs(since) / 0.046))
    return (gain_from_decibels(-62) * noise(hiss_colour, patchy_db=0.6) + tones) * (since > 0) * onset


def scene():
    hz = np.interp(T, *np.transpose(SHAFT_SPEED))
    hz *= 1 + 0.0015 * wander(size=4000)
    shaft = np.cumsum(hz) / SR
    hits, shake = knocks(tick_db=-13.5, chink_db=-1.0, bump_db=-22.0, bowl_db=3.0, late_db=-5.8)
    near = motor(hz, shaft, throb=1.0, rough=0.011, whine_db=-4.0, air_db=-2.0, coast_db=15)
    near += vents() + cream(shaft, spread_db=3.5, splash_db=-3.5, churn_db=-4.5) + room()
    near = signal.sosfilt(signal.butter(10, 14200, fs=SR, output="sos"), near)
    band = signal.butter(4, [330, 14300], "band", fs=SR, output="sos")
    hits = gain_from_decibels(-1.0) * hits + signal.sosfilt(band, spots() + snaps())
    air = near + hits + kitchen(hits, t60=0.17, wet_db=-20.0)
    return air * gain_from_decibels([[3.4], [-5.9]]) + (shake + jolts()) * gain_from_decibels([[6], [-14]])


def low_pass(x):
    return signal.sosfilt(signal.butter(12, 15120, fs=SR, output="sos"), x)


def record(dry):
    own = np.array([noise([(20, -34), (6000, 0.0), (14000, 0.3)], patchy_db=1.5) for side in dry])
    own *= gain_from_decibels(np.interp(T, [6.35, 6.55, QUIET_S, QUIET_S + 0.0022], [-1, -13.0, -16.0, 1]))
    return low_pass(dry + gain_from_decibels(-77.0) * own)


dry = scene()
out = record(dry)
to_wav(out)
```